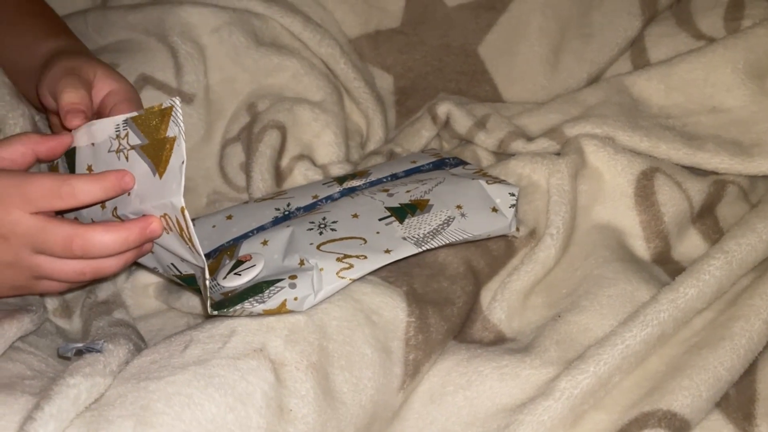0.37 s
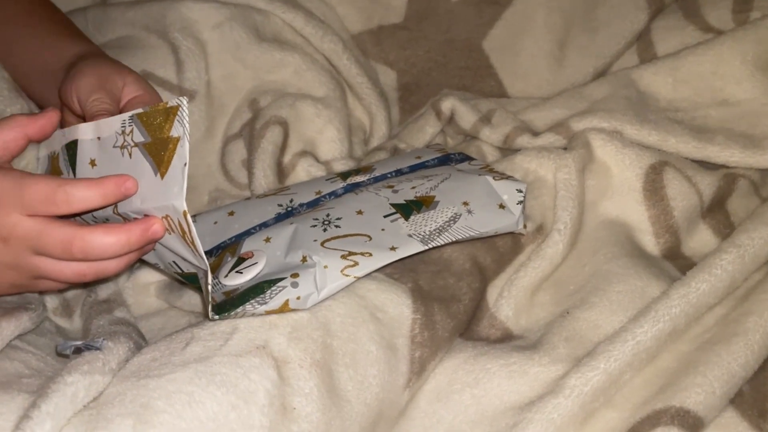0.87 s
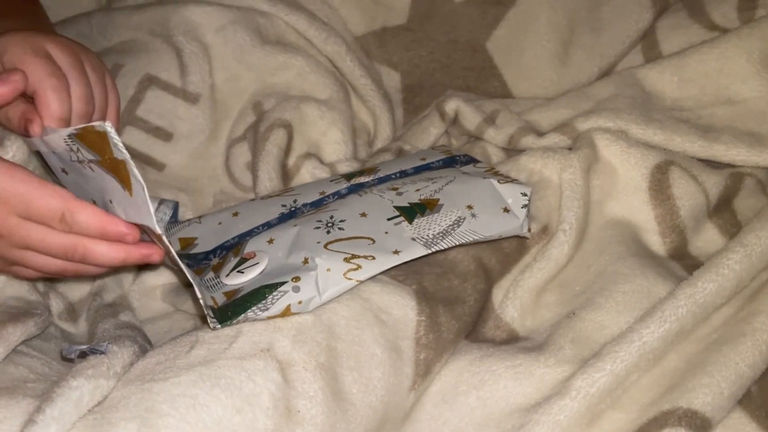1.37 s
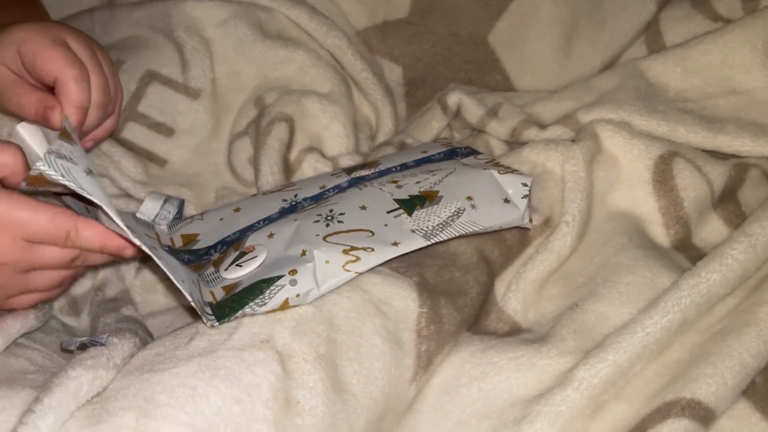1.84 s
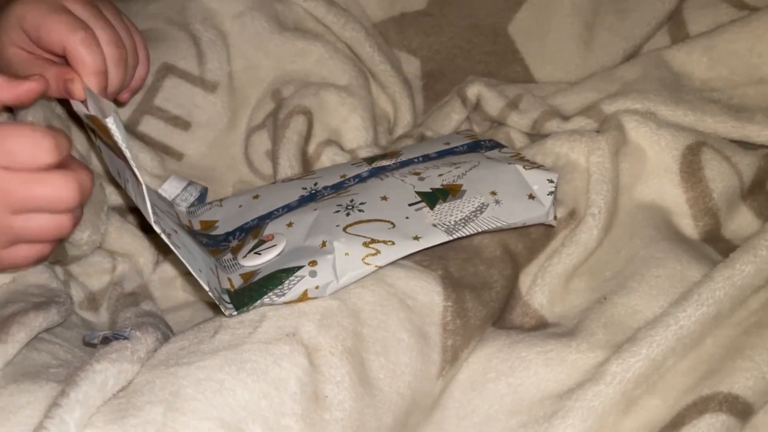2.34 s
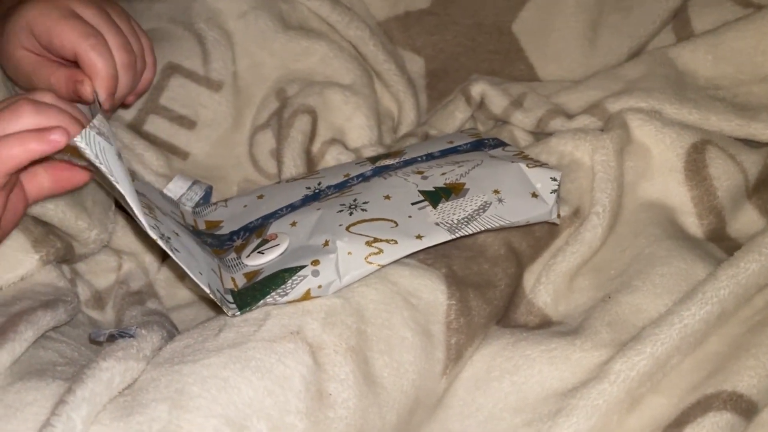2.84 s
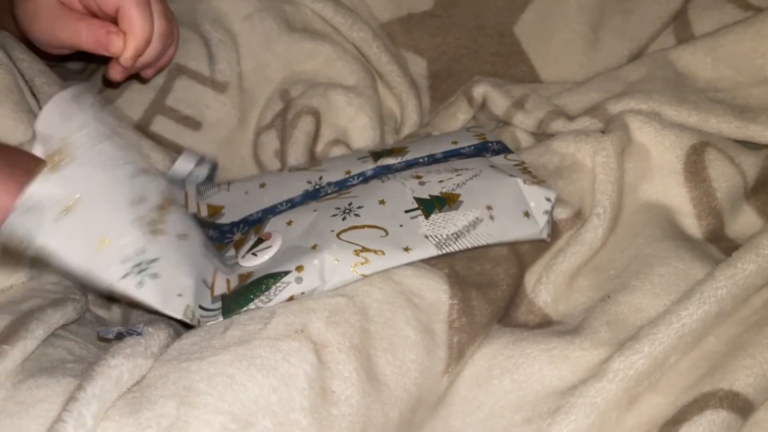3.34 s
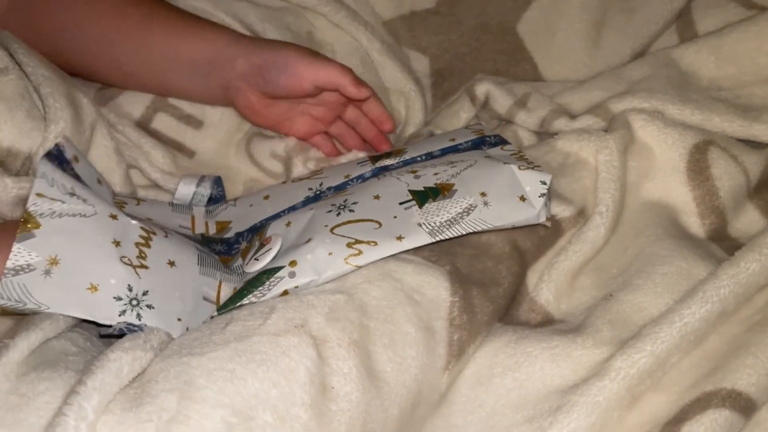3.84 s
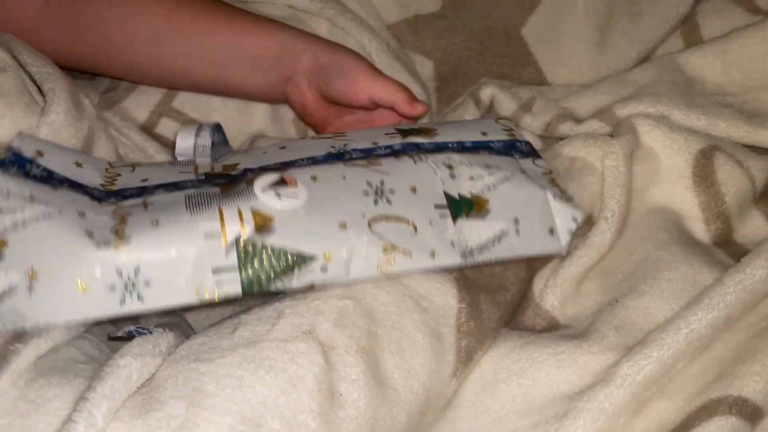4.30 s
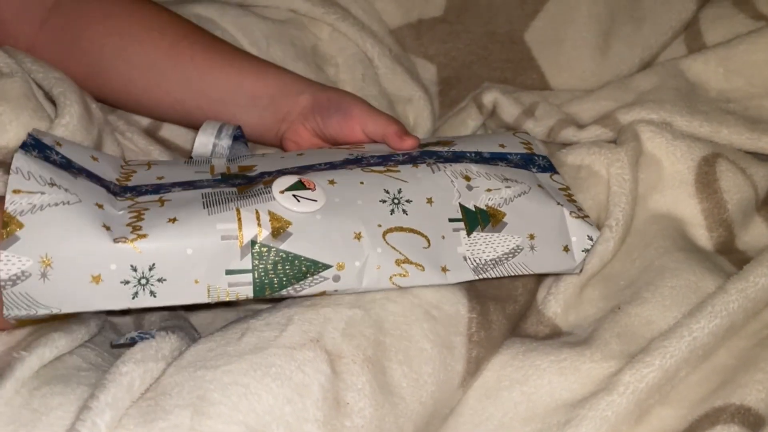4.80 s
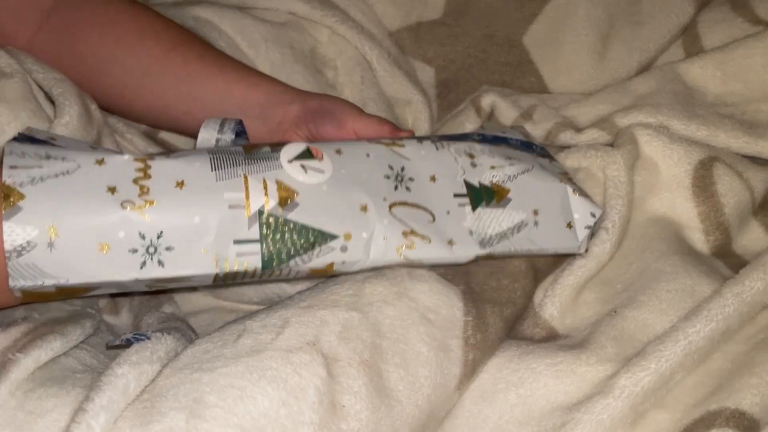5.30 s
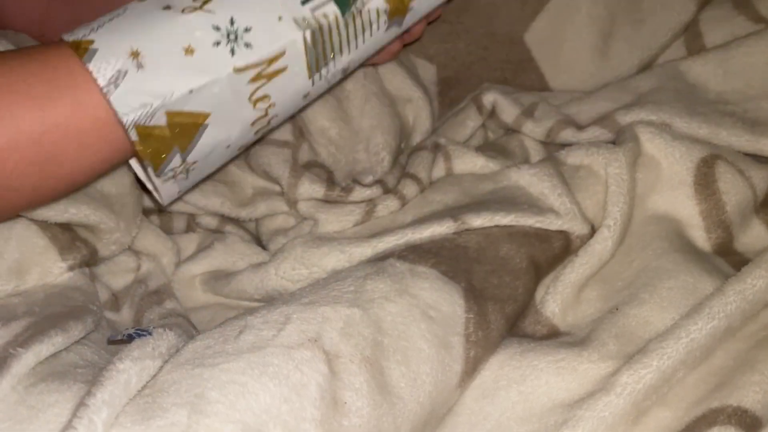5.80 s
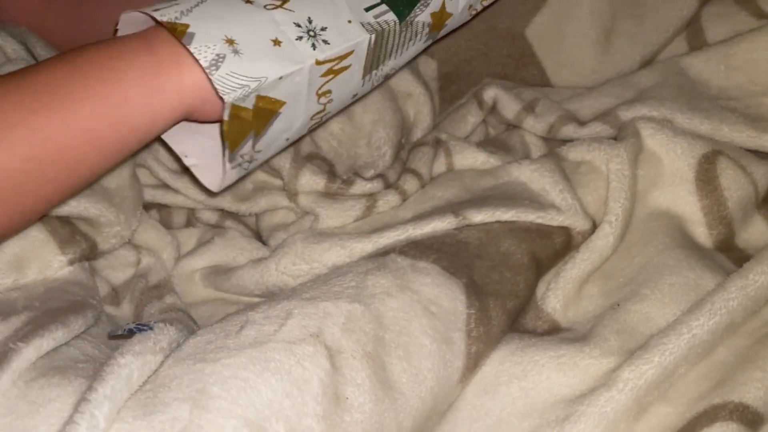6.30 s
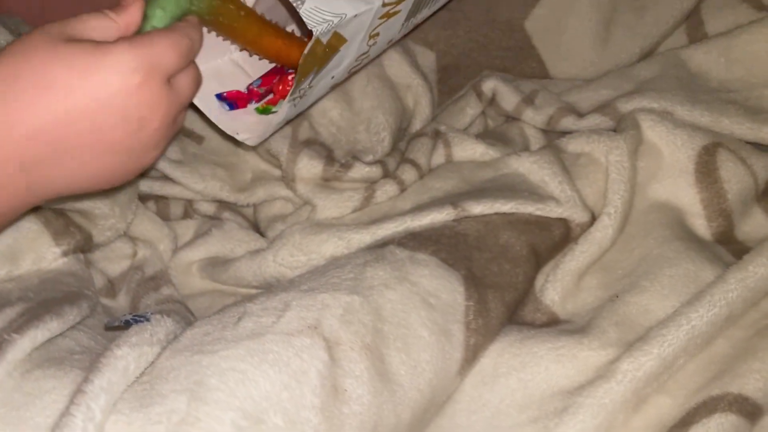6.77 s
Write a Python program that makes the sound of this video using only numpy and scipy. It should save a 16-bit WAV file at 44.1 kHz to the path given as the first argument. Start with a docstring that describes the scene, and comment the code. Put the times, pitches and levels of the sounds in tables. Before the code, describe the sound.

Small hands work wrapping paper: barely audible rubbing, isolated light creases, then a sudden thick run of crackles, pops and papery thumps with rustle between. The activity eases, flares again as the paper is lifted, and ends with fewer snaps and a bright, slightly hollow sliding hiss. Soft low blanket rumble sits beneath. Dry indoor space, near stereo pickup with wide, airy treble.

```python
"""A tube of gift paper is crumpled by small hands on a blanket, close to a phone; then an arm slides inside.
Creases buckle: bursts of random ticks crack, ring the flat panels and thump, over a finer crackle.
Shaped noise makes the rustle of the sheet, the hiss of skin along it and the soft rumble of the blanket.
A quiet furnished room answers the creases with fading noise. The phone's two ports hear partly
different sound; left and right differ in colour and, mostly in the treble, in phase."""
import sys
import numpy as np
from scipy import signal
from scipy.fft import rfft, irfft, next_fast_len
from scipy.io import wavfile
from scipy.ndimage import uniform_filter1d, map_coordinates

SR = 44100
rng = np.random.default_rng(int(sys.argv[2]) if len(sys.argv) > 2 else 0)


def master_out(mix):
    """Clip the mix to full scale and print it as 16-bit PCM to the path in sys.argv[1]."""
    frames = np.transpose(np.atleast_2d(mix))
    ceiling = np.clip(frames, -1, 1)
    pcm = np.round(ceiling * 32767).astype(np.int16)
    wavfile.write(sys.argv[1], SR, pcm)


def linear_from_db(decibels):
    """Turn decibels (scalar or array-like) into linear amplitude factors; 0 gives 1."""
    return 10 ** (np.asarray(decibels, float) / 20)


N = 304721

# Source levels in the tables are relative: each sound adds its own trim later.
# large creases that buckle: (t/s, level/dB, panel pitch f/Hz, crack level/dB, settling level/dB)
LARGE_CREASES = [(1.062, -45.5, 1000, -16.5, -4.5), (1.165, -40.5, 1360, -0.5, 0),
                 (1.2, -34, 1020, -0.5, 0.5), (1.295, -35.5, 1040, -2, -0.5), (1.318, -41, 1220, -3, -4),
                 (1.532, -44.5, 1215, -9.5, -10), (1.603, -36, 1410, 4.5, -1.5),
                 (1.776, -33.5, 830, -7, -19.5), (1.795, -38, 1484, -2, -4.5), (1.826, -30, 595, -40, -3),
                 (1.836, -31.5, 1303, -11, -3.5), (1.946, -35, 1380, -32, -12), (2.013, -24, 1340, 0.5, -7),
                 (2.02, -26, 2900, -13, -12), (2.343, -38, 1170, -41, -4), (2.388, -46.5, 720, -32, -10.5),
                 (2.679, -40.5, 800, 0, -22.5), (2.695, -36, 1810, 4, 2.5), (2.748, -33.5, 840, 7.5, -6.5),
                 (2.925, -28.5, 4330, 3.5, -3.5), (2.956, -28, 1540, -29, -21.5),
                 (3.0, -18, 2900, -45, -2.5), (3.023, -23.5, 2470, 3, 8), (3.035, -25, 530, -30, -16),
                 (3.068, -10, 1200, -3, -10), (3.088, -10, 1560, -2, -12), (3.112, -22, 362, -27, -10.5),
                 (3.135, -22.5, 1740, 0.5, -19), (3.156, -19, 1010, -45, -16),
                 (3.186, -20, 960, -12.5, -14.5), (3.212, -26.5, 1340, -42, -14),
                 (3.302, -26, 1000, -13, -26), (3.33, -23, 930, -17, 3.5), (3.369, -27, 1380, -22, -7),
                 (3.401, -27, 2390, -25, -11.5), (3.436, -23.5, 2060, -14, -24),
                 (3.462, -30, 2180, -15, -26.5), (3.49, -22, 790, -12.5, -10), (3.512, -25, 1070, 1, -24.5),
                 (3.638, -20, 744, -4.5, 0), (3.676, -21.5, 1390, 2, -2), (3.754, -20.5, 1020, -44, -21),
                 (3.765, -16.5, 705, -54, -18), (3.795, -16, 1900, -3, -25.5),
                 (3.872, -20, 3470, -1.5, -18), (3.89, -17.5, 2010, -14, -21), (3.918, -12.5, 1365, 0, -9),
                 (3.935, -25, 950, -19, -3), (4.005, -18.5, 1440, -4.5, -10.5),
                 (4.022, -18, 1570, -3.5, -4), (4.031, -16.5, 990, 5, -6.5), (4.046, -20, 1030, -20, 8),
                 (4.069, -16.5, 960, -55, -12), (4.174, -25, 1110, -34, -7.5),
                 (4.223, -27.5, 1000, -26, -4.5), (4.248, -20, 940, -14.5, 3),
                 (4.267, -25.5, 1440, -14, -6), (4.337, -20.5, 1230, -32, -1.5),
                 (4.365, -11.5, 1730, -19, -33), (4.39, -21.5, 980, -25, -20), (4.41, -23, 890, -32, -20.5),
                 (4.463, -21, 1010, -30, -11), (4.474, -21, 1150, -20, 6), (4.484, -22, 1040, -39, -16.5),
                 (4.508, -27, 1080, -7, -14), (4.554, -18, 1140, -39, -2), (4.581, -25, 890, -9, -1.5),
                 (4.665, -18.5, 920, -19, -8), (4.727, -28.5, 1200, -15, -1), (4.751, -22, 1640, -7, -9),
                 (4.76, -18.5, 980, -6, 0), (4.986, -29, 1100, -24, 5), (5.019, -30.5, 1060, -12, -5.5),
                 (5.061, -33, 493, -30, -9.5), (5.09, -32, 2230, -4, -10.5),
                 (5.109, -23.5, 917, -28, -18.5), (5.142, -16, 1014, -25, -17.5),
                 (5.149, -24, 1460, -20, 6), (5.18, -28.5, 1470, -31, -17.5),
                 (5.208, -22.5, 910, -48, -7.5), (5.225, -29, 970, -30, -12), (5.283, -27.5, 525, -23, -11),
                 (5.299, -18, 1130, -28, 3), (5.312, -10.5, 3680, -1, -22.5),
                 (5.344, -17, 1110, -63, -21.5), (5.544, -32.5, 1340, -3, -5.5),
                 (5.618, -29.5, 1310, -2, -6.5), (5.629, -29.5, 4140, -39, -24.5),
                 (5.653, -26.5, 4160, -3, -20), (5.678, -22, 1130, -43, -16), (5.688, -25, 900, -39, -3.5),
                 (5.737, -30.5, 1090, -4, 10), (5.756, -13, 2250, -24, -11.5), (5.775, -24, 990, -27, 1),
                 (5.8, -24.5, 2540, -22, -10.5), (5.818, -22, 2400, -10, 12),
                 (5.846, -18.5, 1275, -3.5, -13.5), (5.939, -23.5, 1978, -23, -13),
                 (5.977, -18.5, 4550, -1, -26), (6.012, -27.5, 903, -24.5, -7.5),
                 (6.206, -31.5, 4060, -20, -23), (6.216, -17, 1830, -3, -10.5),
                 (6.282, -28, 1214, -7, -21.5), (6.318, -25, 2340, -14, -15.5),
                 (6.362, -28.5, 927, -25, -12), (6.416, -32.5, 1010, -7, 7), (6.564, -21, 740, -6.5, 0),
                 (6.726, -29, 767, -60, 18)]
# steady handling between the snaps: (t/s, sheet rustle level/dB, skin sliding level/dB)
HANDLING = [(0.0, -77, -71), (0.28, -77, -73), (0.62, -77, -84), (0.85, -84, -88), (0.95, -76, -72),
            (1.1, -68, -64), (1.28, -68, -64), (1.44, -80, -74), (1.56, -74, -68), (1.75, -72, -78),
            (1.96, -62, -55), (2.14, -73, -71), (2.3, -84, -86), (2.5, -80, -94), (2.64, -76, -78),
            (2.71, -55, -58), (2.9, -60, -60), (3.16, -48, -52), (3.26, -60, -60), (3.36, -48, -50),
            (3.46, -54, -58), (3.62, -48, -52), (3.84, -58, -60), (4.13, -58, -59), (4.28, -48, -52),
            (4.41, -52, -60), (4.52, -51, -58), (4.86, -57, -59), (5.25, -56, -61), (5.37, -53, -53),
            (5.5, -58, -61), (5.72, -48, -50), (5.84, -45, -46), (5.92, -52, -57), (6.06, -50, -54),
            (6.2, -53, -53), (6.46, -50, -44), (6.74, -57, -46), (6.9, -52, -55)]
# arms leaning on the blanket: (t/s, level/dB)
ARM_WEIGHT = [(0.3, -60.5), (0.9, -62.5), (1.6, -62), (2.0, -53.5), (2.3, -64.5), (2.75, -62), (3.1, -47),
              (4.2, -49.5), (4.9, -50.5), (5.3, -53.5), (6.91, -53)]
# colour of the sheet's rustle: (f/Hz, level/dB)
SHEET_COLOUR = [(200, -19), (450, -5), (620, -2.5), (1000, -15), (1800, -18), (2400, -11), (3600, -23.5),
                (5500, -37)]
# colour of skin on paper, also used for the cracks: (f/Hz, level/dB)
SKIN_COLOUR = [(1200, -7), (2500, 1.5), (3600, -3.5), (4600, -3), (5600, -5), (6900, 2), (10000, -9),
               (13500, -16.5), (15600, -16)]
# colour of the blanket's rumble: (f/Hz, level/dB)
BLANKET_COLOUR = [(22, -56), (40, -3.5), (65, 2.5), (120, -0.5), (330, -10), (700, -20.5), (1500, -21),
                  (4000, -120)]
# gain of the skin hiss above TREBLE_HZ: (t/s, level/dB)
SKIN_TREBLE = [(0, 4.5), (1.7, 8.5), (2.2, 6), (3.4, 3.5), (6.3, 0.5), (6.9, 6.5)]
# pitches at which the hollow tube makes the hiss ring: (f/Hz, width f/Hz)
TUBE_RINGS = [(2500, 450), (4490, 1200)]
# ringing of the tube, over the skin hiss: (t/s, level/dB)
TUBE_LEVEL = [(6.2, -7.5), (6.45, -6)]
# thump of a snap, weaker once the arm fills the tube: (t/s, level/dB)
THUMP_LEVEL = [(0, -8.5), (3.5, -13), (4.6, -18), (6.9, -15.5)]
# time for the room's answer to fall by 60 dB: (f/Hz, fall time t/s)
ROOM_FADE = [(200, 0.45), (1500, 0.11), (10000, 0.07)]
# likeness of the two ports: (f/Hz, likeness, 1 = identical)
PORT_LIKENESS = [(60, .88), (400, .87), (1200, .87), (3000, .72), (5500, .55), (7200, .9995)]
# left-right phase heard in the finished sound, with steps: (f/Hz, phase/radians)
HEARD_PHASE = [(300, 0), (700, .3), (4500, -.3), (5400, -1), (6500, 2.5), (8900, 3.5), (10500, 6),
               (12100, 6.6), (13900, 9.25), (15700, 10.3)]
# left port over right port: (f/Hz, level/dB)
LEFT_OVER_RIGHT = [(300, 0), (1100, 4), (2200, 1), (5300, -3), (6800, 1.5), (8000, 0)]
# top end of the microphone path: (f/Hz, level/dB)
MIC_TOP = [(15900, 0), (16150, -22), (17000, -34), (17600, -90)]

# the sheet stirs around each snap: level from the snap's, swell before and fade after
STIR_DB, STIR_BEFORE_S, STIR_AFTER_S = -24, .007, .035
STIR_FOLLOWS = .5  # share of the settling dB that the stir follows: a clean snap leaves the sheet still
DRAG_DB = -11  # skin dragging on the stirred sheet, from the stir and before trims
CREASE_DB = -5  # the stir sets off small creases: change of the stir level that drives them
TREBLE_HZ = 8000
FLAP_DB_PER_OCTAVE = -4  # small, high panels push less air


def unit(x):
    """Scales x to an rms (average strength) of 1."""
    return x / np.sqrt(np.mean(x ** 2) + 1e-20)


def along(points, hz):
    """Reads (f/Hz, value) points on a log frequency axis."""
    f, value = np.transpose(points)
    return np.interp(np.log(hz + 1), np.log(f + 1), value)


def curves(rows):
    """Gives one value per sample for each column after the time."""
    s, *columns = np.transpose(rows)
    return [np.interp(np.arange(N) / SR, s, column) for column in columns]


def wobble(rate):
    """Draws a smooth random curve with rate knots a second."""
    knots = rng.standard_normal(int(N * rate / SR) + 4)
    return map_coordinates(knots, [np.arange(N) * rate / SR])


def filtered(x, response):
    """Filters x by a complex response of frequency."""
    m = next_fast_len(N + SR // 4)  # spare room so the end does not wrap onto the start
    return irfft(rfft(x, m) * response(np.fft.rfftfreq(m, 1 / SR)), m)[..., :N]


def resonance(f, hz, width):
    """Passes most at hz, as a ringing panel or tube does; a smaller width rings longer."""
    return 1j * f * width / (hz * hz - f * f + 1j * f * width)


def rush(spectrum, patchy_db):
    """Makes two unrelated noises that share patches of random gain, at an overall rms of 1."""
    z = signal.stft(rng.standard_normal((2, N)), nperseg=256)[2]
    patches = uniform_filter1d(rng.standard_normal(z.shape[1:]), 5, 0)  # blurred over frequency
    patches = uniform_filter1d(patches, 6, 1)  # blurred over time
    pair = signal.istft(z * linear_from_db(patchy_db * unit(patches)), nperseg=256)[1][:, :N]
    return unit(filtered(pair, lambda hz: linear_from_db(along(spectrum, hz))))


def hands(stir_db):
    """Gives rustle and skin levels in dB: steady handling plus the stir around each snap."""
    s, db, *_, settle_db = np.transpose(LARGE_CREASES)
    blow_db = db + stir_db + STIR_FOLLOWS * settle_db
    blows = np.bincount(np.round(s * SR).astype(int), linear_from_db(2 * blow_db), N)  # as power
    t = np.arange(-SR // 4, SR // 4 + 1) / SR
    swell = np.exp(-np.abs(t) / np.where(t < 0, STIR_BEFORE_S, STIR_AFTER_S)) ** 2
    stir = np.abs(signal.fftconvolve(blows, swell, "same"))
    rustle_db, skin_db = curves(HANDLING)
    rustle_power = linear_from_db(2 * rustle_db) + stir
    skin_power = linear_from_db(2 * skin_db) + linear_from_db(2 * DRAG_DB) * stir
    return 10 * np.log10([rustle_power, skin_power])


def sheet_rustle(rustle_db, grip):
    """The moving sheet rustles: patchy noise that follows the hands and their unsteady grip."""
    return linear_from_db(rustle_db - 6.5 + 1.8 * grip + 1.8 * wobble(60)) * rush(SHEET_COLOUR, patchy_db=3)


def skin_hiss(skin_db, grip):
    """Skin rubs along the paper: bright noise, with a ring from the hollow tube."""
    skin = linear_from_db(skin_db + 5 + 0.27 * grip + 2.2 * wobble(55)) * rush(SKIN_COLOUR, patchy_db=2.6)
    treble = filtered(skin, lambda f: f > TREBLE_HZ)
    skin += (linear_from_db(curves(SKIN_TREBLE)[0]) - 1) * treble
    ring = filtered(skin, lambda f: sum(resonance(f, hz, width) for hz, width in TUBE_RINGS))
    return skin + linear_from_db(curves(TUBE_LEVEL)[0]) * ring


def blanket_rumble():
    """The blanket takes the weight of the arms: soft, low noise."""
    return linear_from_db(curves(ARM_WEIGHT)[0] + 1.1 * wobble(9)) * rush(BLANKET_COLOUR, patchy_db=3)


def rubbing():
    """The same unsteady grip drives the rustle and the skin; the blanket rumbles below."""
    rustle_db, skin_db = hands(STIR_DB)
    grip = wobble(15)
    return sheet_rustle(rustle_db, grip) + skin_hiss(skin_db, grip) + blanket_rumble()


def buckle(rows, size):
    """A crease strains, then gives way in fibre ticks that crack, ring the panel and push air."""
    s, db, panel_hz, thump_db, crack_db, settle_db = np.transpose(rows)[:, :, None, None]
    strain = SR // 200  # samples of creaking before the crease lets go
    t = (np.arange(size) - strain) / SR
    f = np.fft.rfftfreq(size, 1 / SR)
    after = np.clip(t, 0, 1)

    def peak(spectrum):
        """Turns spectra into sound with a highest peak of 1 per crease."""
        x = irfft(spectrum, size)
        return x / np.abs(x).max(axis=(1, 2), keepdims=True)

    # both renderings share the uneven tick strengths
    ticks = rng.standard_normal((len(rows), 2, size)) * rng.exponential(1, (len(rows), 1, size))
    creak = 0.1 * np.exp(np.clip(t, -1, 0) / 0.003) * (t < 0)
    burst = (after / 0.00058) ** 2 * np.exp(-after / 0.00067)
    flurry = rfft(ticks * (creak + burst))
    # the fold keeps ticking as it relaxes, falling 60 dB in 0.071 s
    settling = rfft(ticks * (1 - np.exp(-after / 0.00047)) * linear_from_db(-60 * after / 0.071))
    body = flurry + linear_from_db(settle_db) * settling

    panel = resonance(f, panel_hz, 0.54 * panel_hz) ** 2 + 0.63 * resonance(f, 992.0, 890.0) ** 2
    sound = linear_from_db(db + 2) * peak(body * panel)
    # sharp creases ring higher panels
    sound += linear_from_db(db + 0.32 * crack_db - 12.0) * peak(body * resonance(f, 3460.0, 1900.0) ** 2)
    # the crack itself, with its bass thinned below 640 Hz
    crack = (flurry + linear_from_db(settle_db - 36.0) * settling) * linear_from_db(along(SKIN_COLOUR, f))
    sound += linear_from_db(db + crack_db + 12) * peak(crack * 1j * f / (640.0 + 1j * f))
    # the whole sheet flaps
    thump = (flurry + settling / 2) * resonance(f, 341.0, 526.0) ** 2
    sound += linear_from_db(db + thump_db + 11) * peak(thump)

    sound *= np.clip((size - np.arange(size)) / (size / 4), 0, 1)  # fade the last quarter
    at = (np.round(s[:, 0] * SR).astype(int) + np.arange(size)).ravel()
    sides = [np.bincount(at, sound[:, side].ravel(), N + 2 * size) for side in (0, 1)]
    return np.array([side[strain:][:N] for side in sides])  # the release falls on the listed time


def crackle(count):
    """Many small creases buckle in clumps, more and louder as the sheet is worked harder."""
    rustle_db = hands(STIR_DB + CREASE_DB)[0]
    busy = np.cumsum(linear_from_db(7 * wobble(26) + .5 * rustle_db))
    chance, spread = rng.random((count, 2)), rng.standard_normal((count, 4))
    at = np.searchsorted(busy / busy[-1], chance[:, 0]).clip(0, N - 1)
    db = rustle_db[at] + 8.5 - 3.4 * np.log(1 - .92 * chance[:, 1])  # few large, many small
    panel_hz = np.clip(1500 * np.exp(.65 * spread[:, 0]), 400, 6000)
    thump_db = -27 + 4 * spread[:, 1]
    crack_db = -17 + 6 * spread[:, 2]
    settle_db = -16 + 4 * spread[:, 3]
    return buckle(np.transpose([at / SR, db, panel_hz, thump_db, crack_db, settle_db]), size=1024)


def snaps():
    """Large creases snap; the thump follows how freely the sheet flaps and how big the panel is."""
    s, db, panel_hz, crack_db, settle_db = np.transpose(LARGE_CREASES)
    thump_db = np.interp(s, *np.transpose(THUMP_LEVEL))
    thump_db = thump_db + FLAP_DB_PER_OCTAVE * np.log2(panel_hz / 1000)
    return buckle(np.transpose([s, db, panel_hz, thump_db, crack_db, settle_db]), size=2048)


def room(x):
    """The room answers with noise in which each frequency dies at its own speed."""
    hz, t, z = signal.stft(rng.standard_normal((2, SR // 3)), SR, nperseg=256)
    tail = signal.istft(z * linear_from_db(-60 * t / along(ROOM_FADE, hz)[:, None]), SR, nperseg=256)[1]
    tail = tail / np.linalg.norm(tail[0])
    delayed = np.pad(x, ((0, 0), (220, 0)))  # 220 samples, about 5 ms
    return signal.fftconvolve(delayed, tail, axes=1)[:, :N]


def scene():
    """Two renderings of the same motions: what both ports share, and what differs."""
    rubbed = rubbing()
    creases = crackle(count=1400) + snaps()
    return rubbed + creases + linear_from_db(-14.5) * room(creases)


def band_limit(x):
    """A steep low-pass at the top of the band."""
    return signal.sosfilt(signal.butter(12, 17660, fs=SR, output="sos"), x)


def record(dry):
    """Mixes shared and differing sound into two ports, then sets their colour and heard phase."""
    def turn(hz):
        """Mixing angle that gives the listed likeness."""
        return np.arccos(np.clip(along(PORT_LIKENESS, hz), -1, 1)) / 2

    def lean(hz):
        """Half the left-right difference; the other port gets the inverse."""
        phase = np.interp(hz, *np.transpose(HEARD_PHASE))
        return linear_from_db(along(LEFT_OVER_RIGHT, hz) / 2) * np.exp(.5j * phase)

    shared, differing = filtered(dry, lambda hz: np.array([np.cos(turn(hz)), np.sin(turn(hz))]))
    ports = np.array([shared + differing, shared - differing])
    ports = filtered(ports, lambda hz: linear_from_db(along(MIC_TOP, hz)) * np.array([lean(hz), 1 / lean(hz)]))
    return band_limit(ports)


dry = scene()
out = record(dry)
master_out(out)
```